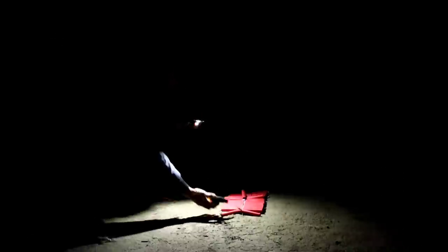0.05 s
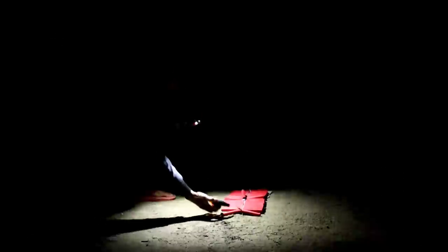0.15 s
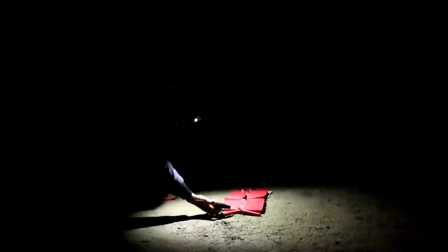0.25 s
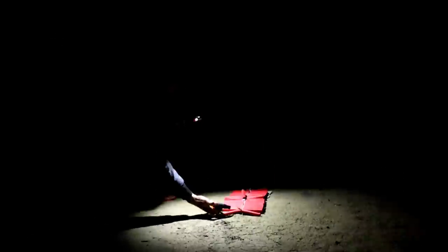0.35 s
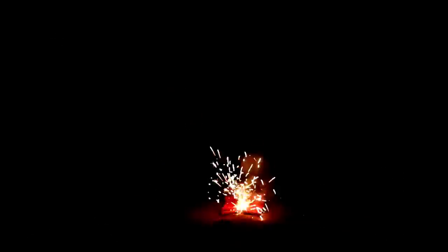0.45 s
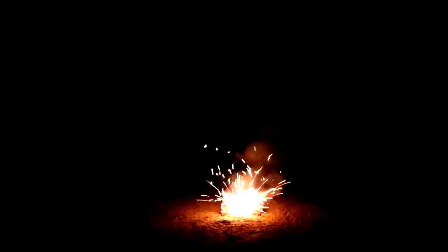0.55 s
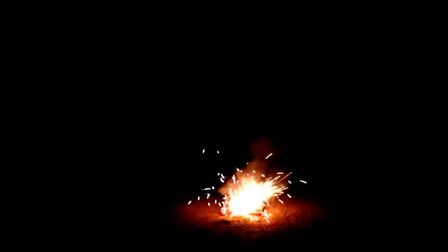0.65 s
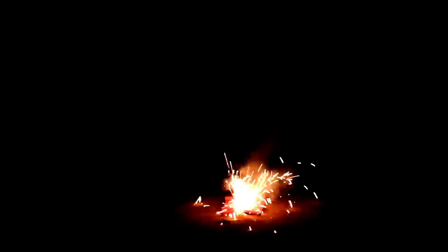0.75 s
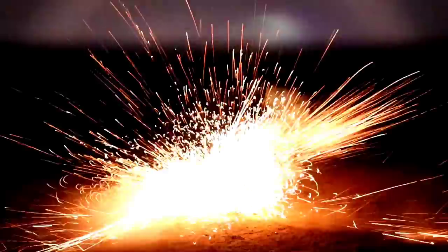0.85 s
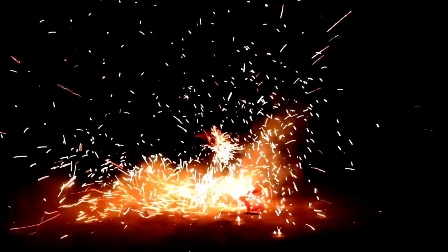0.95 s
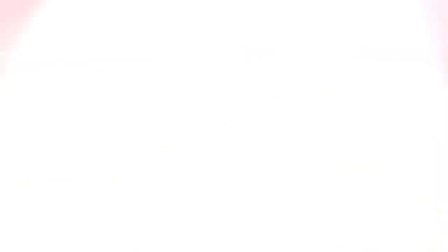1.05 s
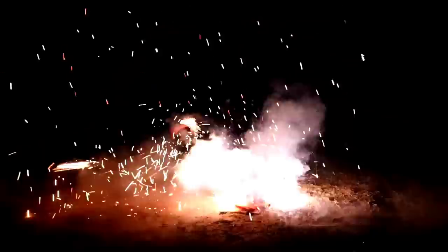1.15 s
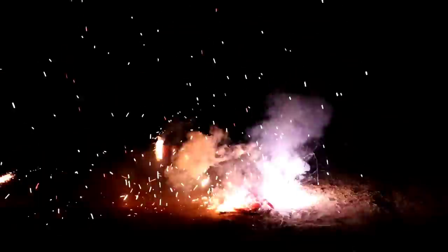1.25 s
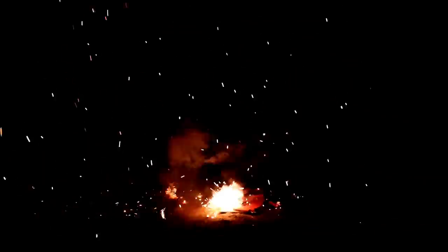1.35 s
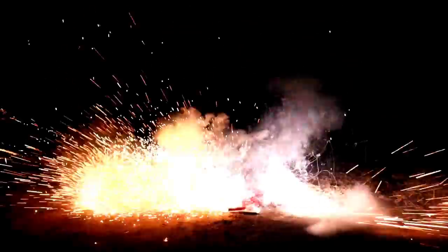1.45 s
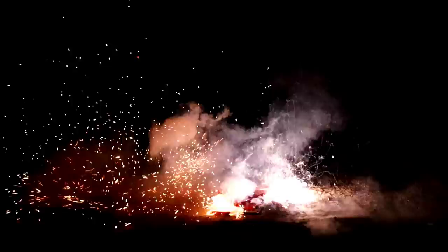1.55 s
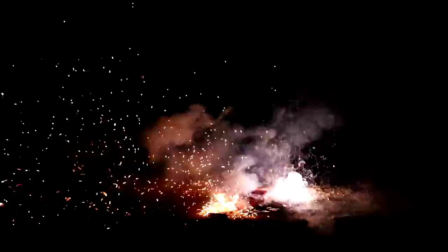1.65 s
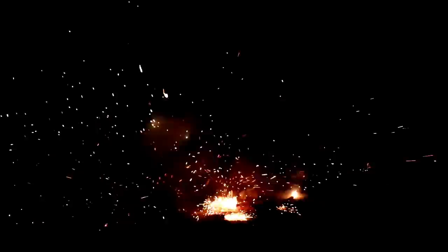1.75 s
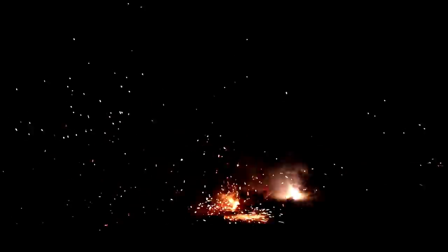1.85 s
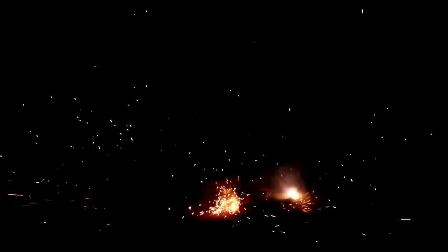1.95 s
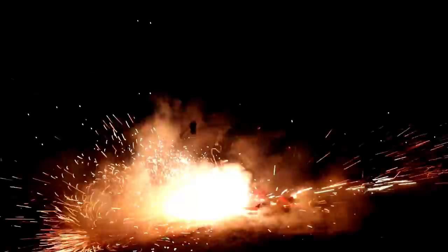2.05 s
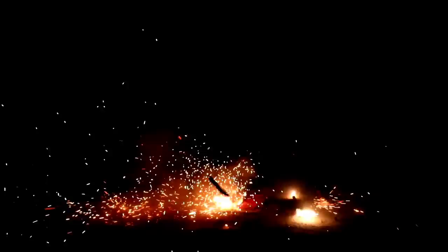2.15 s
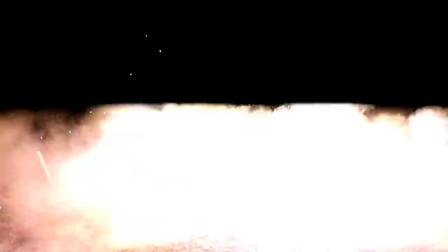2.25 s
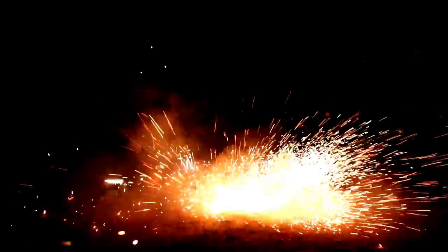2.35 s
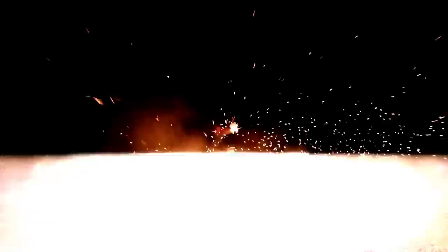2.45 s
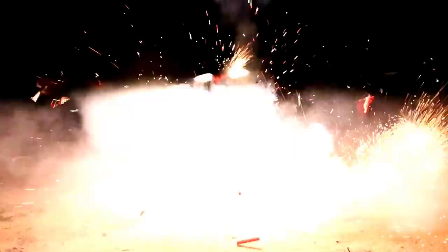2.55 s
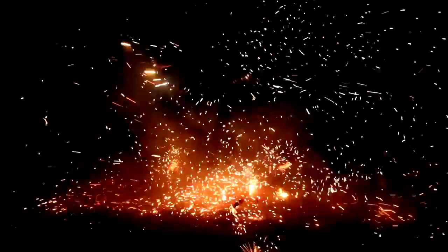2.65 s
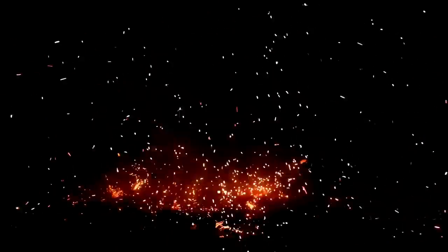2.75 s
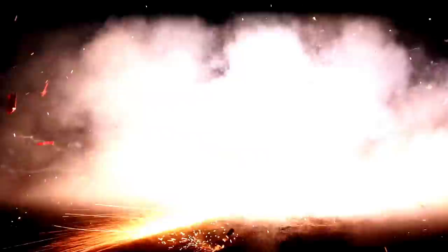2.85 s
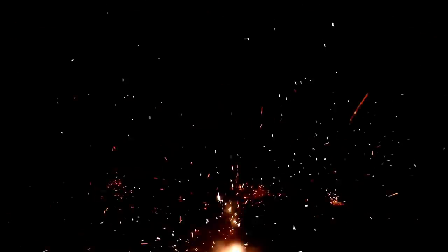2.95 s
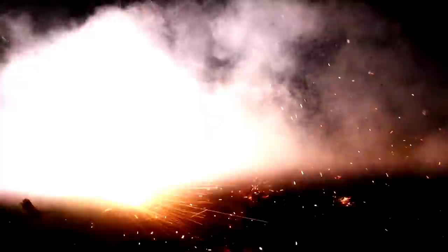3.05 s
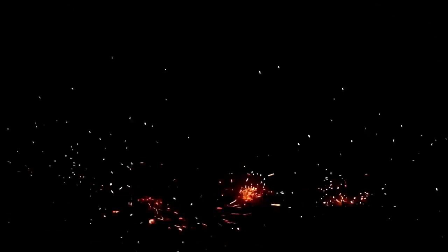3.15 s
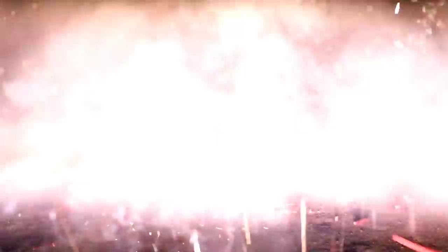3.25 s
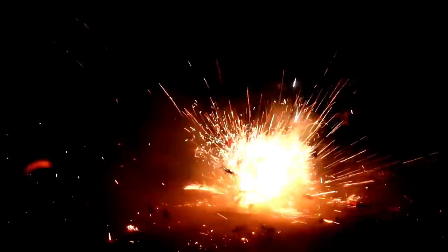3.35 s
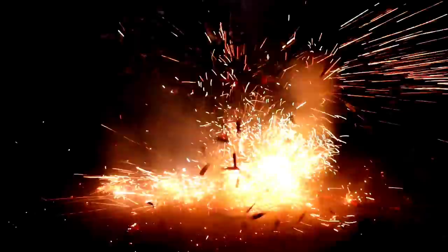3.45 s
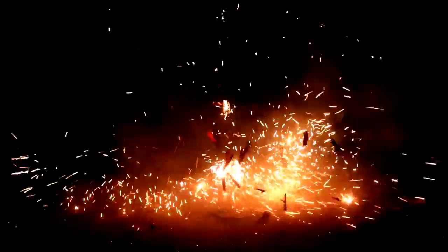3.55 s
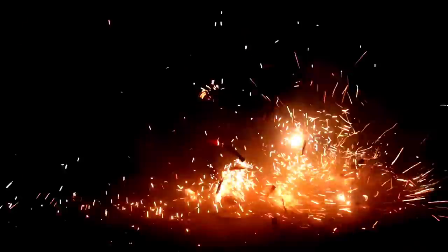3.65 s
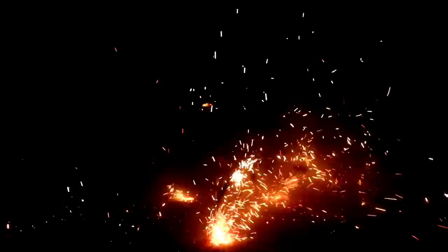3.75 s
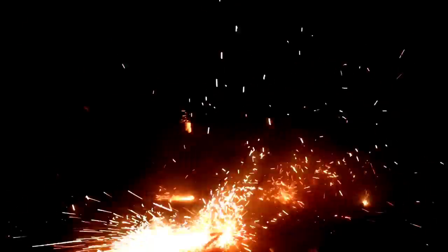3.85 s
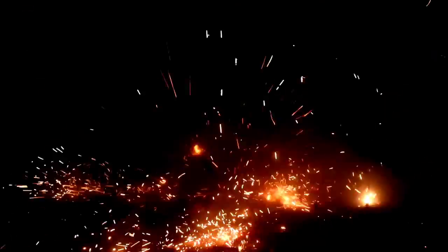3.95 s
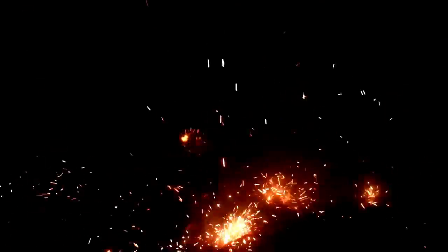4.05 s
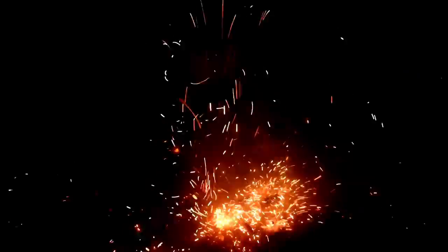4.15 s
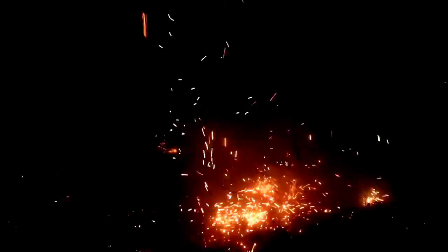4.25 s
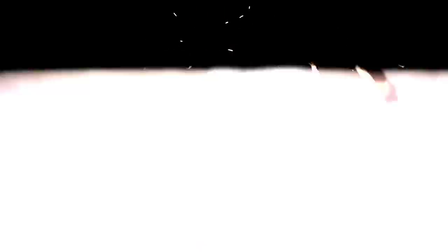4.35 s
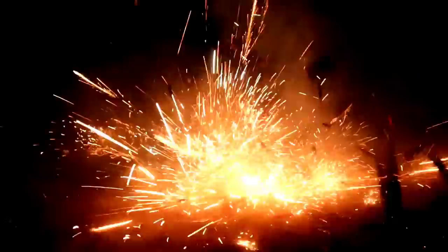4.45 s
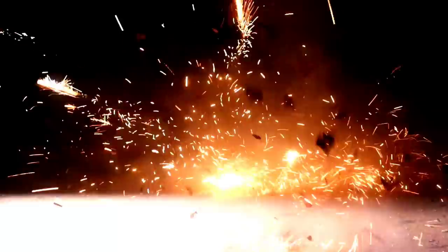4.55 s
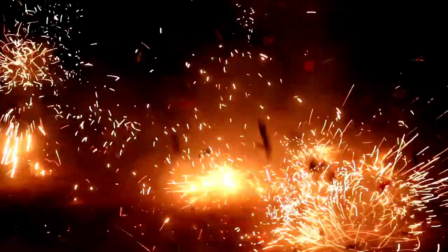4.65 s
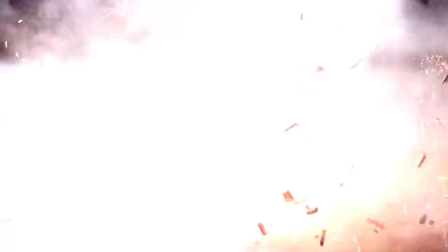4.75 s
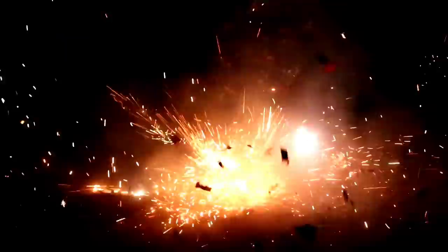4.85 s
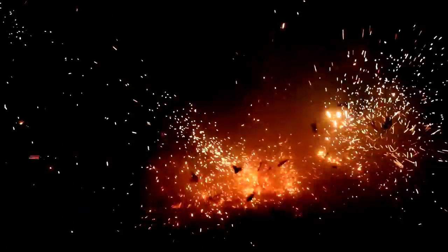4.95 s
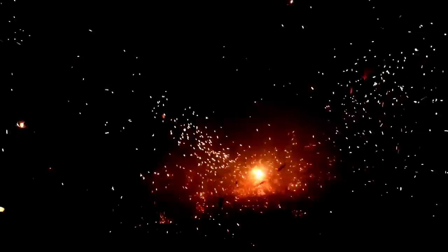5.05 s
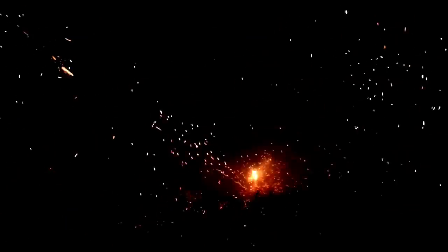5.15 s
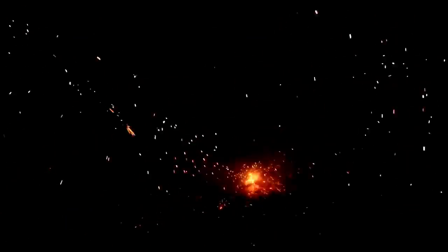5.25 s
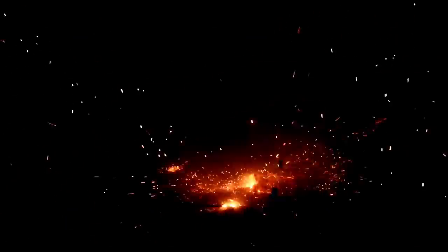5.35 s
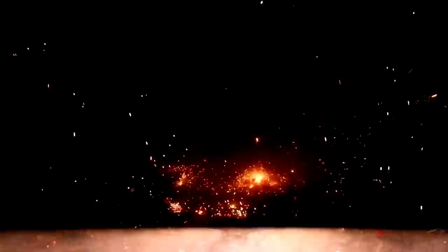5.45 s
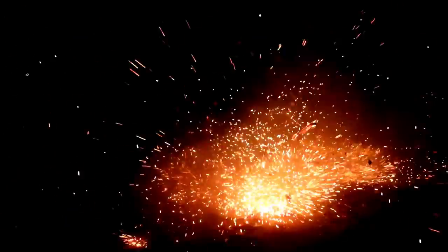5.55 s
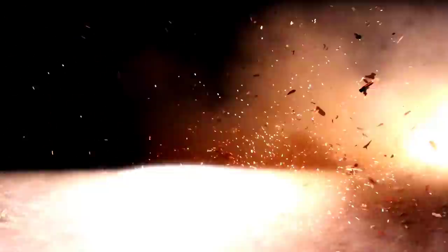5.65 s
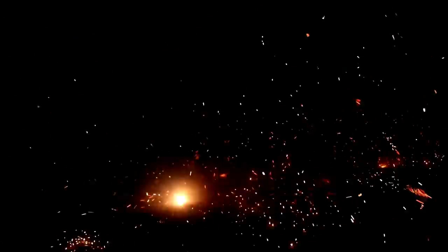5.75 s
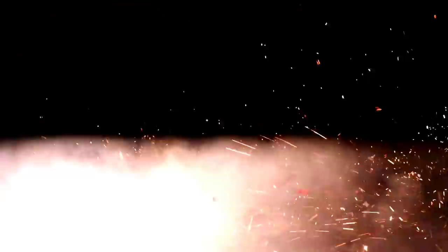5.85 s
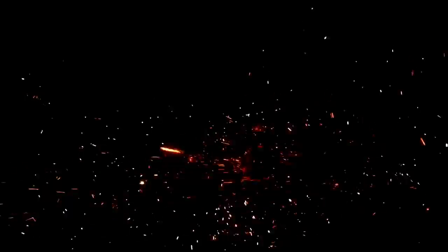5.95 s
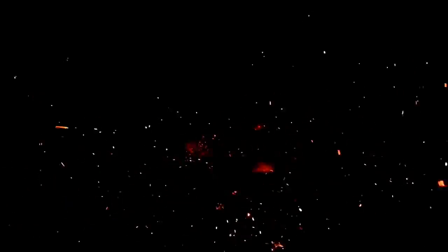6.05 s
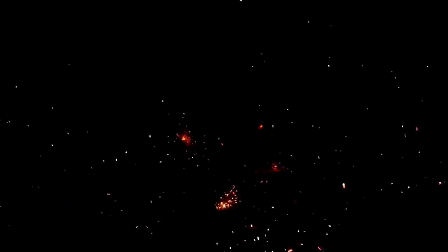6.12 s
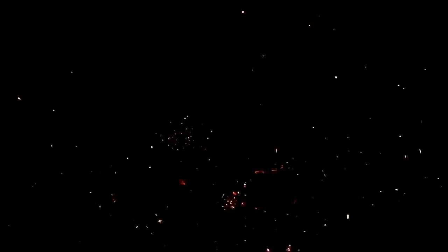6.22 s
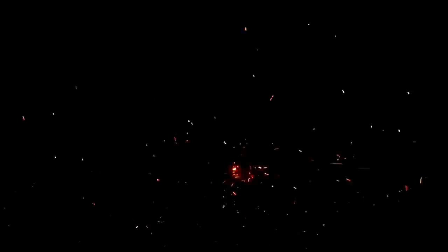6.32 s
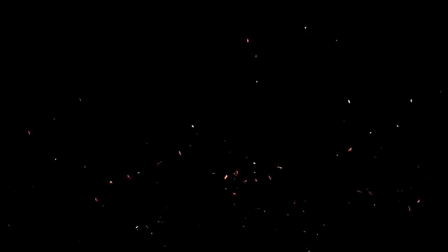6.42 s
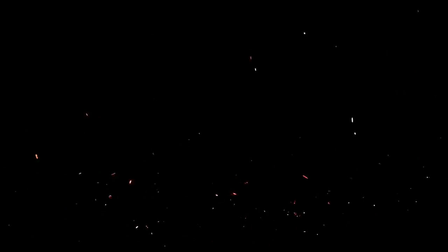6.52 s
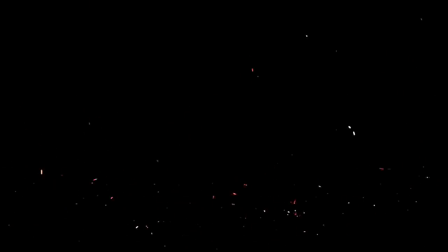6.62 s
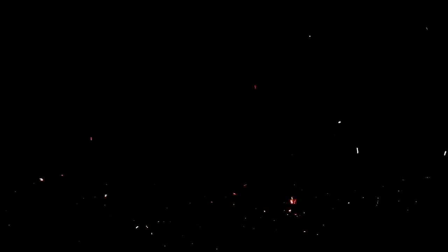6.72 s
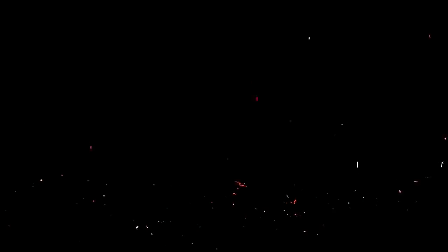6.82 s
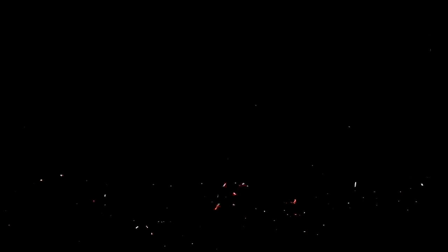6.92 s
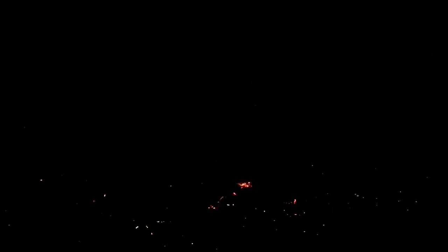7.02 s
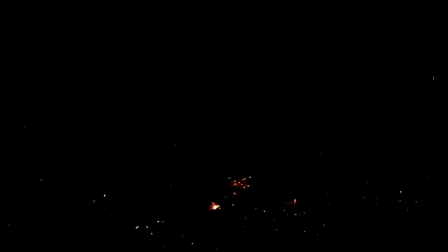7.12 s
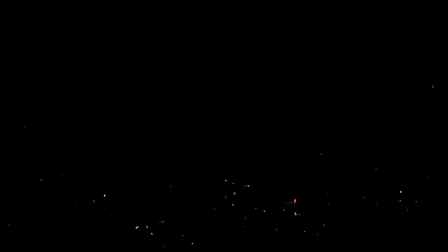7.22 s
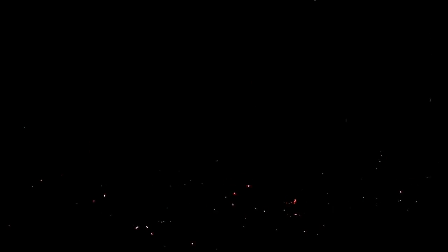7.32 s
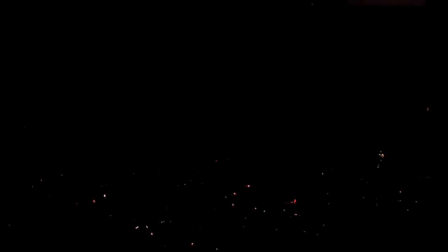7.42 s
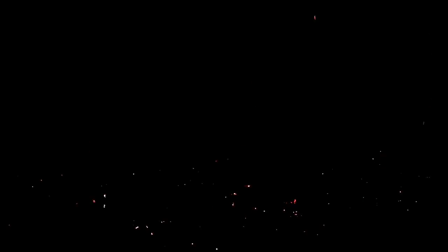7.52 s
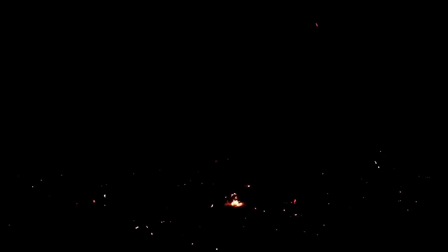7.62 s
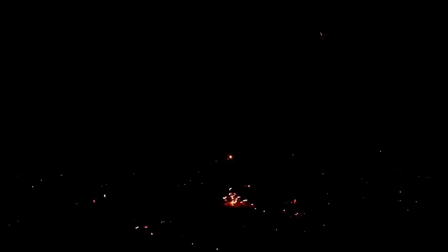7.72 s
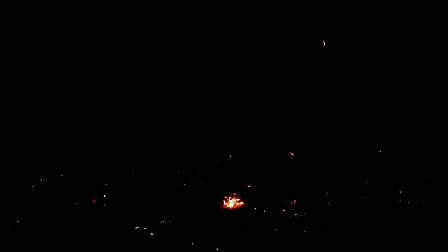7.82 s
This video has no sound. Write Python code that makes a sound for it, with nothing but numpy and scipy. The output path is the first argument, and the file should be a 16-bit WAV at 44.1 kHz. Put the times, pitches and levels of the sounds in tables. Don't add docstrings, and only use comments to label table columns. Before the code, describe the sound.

Outdoors at night, a fuse hisses quietly with spitting embers and little clicks. Firecrackers then burst in sharp, irregular clusters a few metres from a phone. Each bang clips harshly and ducks the sound for a moment, while walls throw back slaps and a boomy tail. The run ends, a quiet lull follows, then one last bang cracks amid fizz.

```python
import sys
import numpy as np
from scipy import signal
from scipy.fft import rfft, irfft
from scipy.io import wavfile
from scipy.ndimage import uniform_filter1d

SR = 44100
rng = np.random.default_rng(int(sys.argv[2]) if len(sys.argv) > 2 else 0)


def volts_from_decibels(level):
    exponent = np.asarray(level, float) / 20
    return 10 ** exponent


def transcribe(u):
    v = np.clip(np.atleast_2d(u).T, -1, 1)
    q = np.round(v * 32767).astype(np.int16)
    wavfile.write(sys.argv[1], SR, q)


N = 347575

# start in seconds, overload length in ms,
# echo strength in dB, brightness in dB, gain change after it in dB.
MAIN_BLASTS = [(0.9487, 2.47, -11.5, -32, 6), (0.9651, 1.82, -21, -4, -35), (1.5728, 1.4, -24.5, -11, 1.5),
               (1.7061, 0.68, -44.5, -1, 8), (1.8437, 1.86, -16.5, -5, 0.5), (2.0367, 2, -17.5, -7, -23.5),
               (2.1786, 2.36, -35.5, 5.5, -32.5), (2.4091, 1.34, -27, 4, -6.5),
               (2.4963, 1.28, -21, -5, -29.5), (2.6112, 0.97, -32.5, 5, -10),
               (2.6487, 1.43, -19.5, -12.5, -25.5), (2.7096, 1.27, -23, 1, 5),
               (2.7282, 2.2, -23.5, -16, -39), (3.004, 2.1, -27, -2.5, -13.5),
               (3.0579, 2.6, -45, -9, -2.5), (3.2038, 2.05, -24.5, -3.5, -27.5),
               (3.3973, 1.51, -23.5, 5.5, -6.5), (3.4894, 0.79, -18.5, 1.5, -20),
               (3.5606, 1.66, -29, -9, -23), (3.6344, 1.8, -32, 3, -19.5),
               (3.7606, 1.88, -27.5, 13, -13.5),
               (4.0628, 0.99, -21.5, -8, -8.5), (4.2235, 1.9, -24, 0.5, 0),
               (4.524, 0.92, -18.5, -8.5, -15.5), (4.636, 2.07, -29.5, -10.5, -26.5),
               (4.7341, 2.03, -39, 1, -0.5), (4.7464, 3.1, -43, 10, -15), (4.8608, 0.93, -37.5, 7, -13),
               (4.8982, 0.88, -45, 6, -6), (4.9275, 3.03, -46, -4, -6.5), (4.9513, 1.3, -26, -0.5, -11.5),
               (5.0541, 0.64, -37.5, -13, -29), (5.4475, 2.2, -51, -12, -1),
               (5.6164, 1.57, -22.5, -4.5, -5), (5.6599, 1.54, -27.5, -9, -19.5), (5.8078, 3.4, -24, -6, 4),
               (5.8323, 2.15, -34.5, -12, -19), (5.9432, 1.54, -30, 4, -25), (5.9628, 1.24, -33, -4, 2),
               (6.0089, 2.3, -45, 12, -28.5), (6.0449, 3.56, -24.5, -6, -6.5),
               (6.3855, 0.87, -28.5, 0.5, 10), (7.5287, 0.89, -17, -10.5, -19)]
BLASTS = MAIN_BLASTS


def colour(x, shape):
    hz, db = np.transpose(shape)
    log_f = np.log(np.arange(N // 2 + 1) * SR / N + 1)
    y = irfft(rfft(x) * volts_from_decibels(np.interp(log_f, np.log(hz), db)), N)
    return y / y.std()


def resonate(x, hz, width):
    return signal.lfilter(*signal.iirpeak(hz, hz / width, SR), x)


def grains(spread_db):
    size = np.minimum(rng.exponential(size=N), 3)
    x = rng.standard_normal(N) * volts_from_decibels(spread_db * size)
    return x / x.std()


def walk(rate):
    k = int(SR / rate)
    held = np.repeat(rng.standard_normal(N // k + 1), k)
    return uniform_filter1d(held, k)[:N]


def add(out, s, piece):
    i = int(s * SR)
    out[i:i + len(piece)] += piece[:N - i]


def traffic(rumble_db):
    # frequency in Hz, spectral density in dB per Hz.
    rumble_spectrum = [(12, -48), (20, -10), (49, 3), (114, 7), (217, 6), (497, -10.5), (823, -14.5),
                       (1070, -18), (2500, -22), (3250, -25.5), (5500, -120)]
    return volts_from_decibels(rumble_db + 1.5 + 3 * walk(30)) * colour(rng.standard_normal(N), rumble_spectrum)


def fuses(fizz_db):
    # peak in seconds, rise in ms, fall in ms, level in dB.
    flare_events = [(0.236, 5.4, 9.2, -46), (0.271, 8.3, 18, -43), (0.352, 10.5, 8.8, -37.5),
                    (.62, 12, 14, -42.5), (0.659, 8.1, 20, -33), (.885, 46, 44, -53),
                    (1.569, 6, 0.81, -8.5), (1.596, 2, 1.1, -25.5), (2.038, 2, 1.5, -3.5),
                    (3.006, 5.3, 1.5, -16), (3.054, 4.7, 9, -26), (3.139, 0.5, 4.6, -9.5),
                    (3.969, 5, 2.8, -34), (5.056, 18, 5.3, -25), (5.149, 5.7, 3.5, -27),
                    (5.448, 5, 4.5, -20), (7.685, 10, 8, -36.5), (7.604, 1, 4, -25),
                    (3.128, 0.68, 1.2, -15)]
    # frequency in Hz, spectral density in dB per Hz.
    fizz_spectrum = [(410, -27), (700, 2), (934, 1), (1520, 5), (10500, -6), (15000, -12), (16000, -14)]
    t = np.arange(N) / SR
    gain = volts_from_decibels(fizz_db + 2.4 * walk(53))
    for peak, rise, fall, db in flare_events:
        slope = np.minimum((t - peak) * 1000 / rise, (peak - t) * 1000 / fall)
        gain = gain + volts_from_decibels(db) * np.exp(slope)
    return gain * colour(grains(3), fizz_spectrum)


def embers():
    # start in seconds, peak in dB.
    spit_events = [(.19, -35.5), (.236, -26), (.255, -27), (.268, -21.5), (.355, -31), (.404, -35),
                   (.446, -25.5), (.615, -34), (0.71, -22.5), (1.277, -38), (1.509, -28), (1.83, -31),
                   (2.021, -19), (2.074, -24), (3.1375, -7), (6.65, -52), (6.76, -44), (6.835, -43),
                   (6.918, -43), (7.0, -46), (7.195, -49), (7.399, -41), (7.855, -44), (7.874, -28)]
    spit_ms, spit_hz = 2.05, 5800
    ping_s, ping_hz, ping_db, ping_t60_s = 3.141, 4750, -25, .11
    out, t = np.zeros(N), np.arange(6000) / SR
    grit = rng.standard_normal((len(spit_events), len(t)))
    for (s, db), noise in zip(spit_events, grit):
        add(out, s, volts_from_decibels(db) * noise * np.exp(-t * 1000 / spit_ms))
    out = resonate(out, spit_hz, 9000)
    add(out, ping_s, volts_from_decibels(ping_db - 60 * t / ping_t60_s) * np.sin(2 * np.pi * ping_hz * t))
    return out


def ticks():
    # start in seconds, peak in dB, pitch in Hz.
    scrap_events = [(0.355, -24, 2080), (0.404, -28.5, 1510), (0.447, -17, 1710), (0.704, -14.5, 553),
                    (0.711, -18, 840), (0.731, -8, 1430), (0.757, -25, 1680), (0.775, -28, 555),
                    (0.872, -12, 1300), (0.884, -18, 774), (6.832, -38, 1320), (6.998, -37, 501)]
    out, t = np.zeros(N), np.arange(400) / SR
    grit = rng.standard_normal((len(scrap_events), len(t)))
    for (s, db, hz), noise in zip(scrap_events, grit):
        click = 0.097 * noise * np.exp(-t / 0.0045)
        ring = np.sin(2 * np.pi * hz * t) * np.exp(-t * hz / 1.1)
        add(out, s, volts_from_decibels(db) * (click - ring))
    return out


def charges():
    # start in seconds, overload length in ms, depth in dB.
    neighbour_events = [(1.5687, .7, -4.7), (1.57, .43, -6), (1.7079, .39, -4), (1.8461, 2.13, 0),
                        (1.867, .32, -2.8), (1.8679, .43, -7.4), (1.9386, .32, -5.7), (2.0408, .25, 0),
                        (2.1335, .18, -4.7), (2.6142, 1.2, 0), (2.6401, .14, -5), (2.7135, .34, 0),
                        (2.7145, .2, -2.3), (3.1277, .6, -6), (3.1383, .5, -3.3), (3.3993, 2.72, 0),
                        (3.4029, .59, -4.8), (3.4049, .34, -4.2), (3.4083, .39, -1.5), (3.4094, .34, -4.2),
                        (3.4922, .09, -1.2), (3.493, .25, 0), (3.5632, 1.54, -.5), (3.5679, 1.32, -2.3),
                        (3.5799, .57, -2.2), (3.5836, .2, -2.5),
                        (4.0665, .29, 0), (4.2258, 2.74, 0), (4.5266, .32, 0), (4.5276, 1.22, 0),
                  (4.5302, 1.02, -3.2), (4.536, .57, -.6), (4.5478, .27, -6.2), (4.9003, 1.2, -1),
                  (5.0554, 1.6, -3), (5.6192, 1.2, 0), (5.8129, 1.09, 0), (5.8157, .2, -1.2),
                  (5.8166, .2, -1.4), (6.0493, .43, -5), (6.0512, 1.04, -1.9), (6.388, 1.84, 0),
                  (6.3915, .27, -2.5), (6.3929, .16, -3.9), (7.5311, .48, 0), (7.5326, .25, 0)]
    full_db, crowded_db, recover_ms = -3.5, -31.5, 76
    flips_per_ms, flips_per_db = 3.2, .15
    s, length, _, bright_db, _ = np.transpose(BLASTS)
    pause_ms = np.diff(s, prepend=0) * 1000
    swell_db = full_db + crowded_db * np.exp(-pause_ms / recover_ms)
    flips = (length * (flips_per_ms + flips_per_db * bright_db)).clip(0, 11)
    chain = [(t, ms, db, ms * flips_per_ms, full_db + crowded_db) for t, ms, db in neighbour_events]
    return list(zip(s, length, 0 * s, flips, swell_db)) + chain


def blasts():
    muffled_s = [1.5727, 3.0576, 5.4472, 5.9434]
    sag_hz, let_go_ms, rail_db = 137, 4.5, -0.27
    chatter_ms = 1.7
    out, ms = np.zeros(N), np.arange(-8, 14, 1000 / SR)
    rows = charges()
    chance = rng.random((len(rows), 2, 12))
    grit = rng.standard_normal((len(rows), len(ms)))
    sag = signal.butter(1, sag_hz, "high", fs=SR)
    for (s, length, depth_db, flips, swell_db), (place, stay), noise in zip(rows, chance, grit):
        down = 1. * ((ms >= 0) & (ms < length))
        span = min(length, chatter_ms)
        flips = int(flips * span / length)
        if np.abs(s - np.array(muffled_s)).min() < .0021:
            flips = 1
            down = np.where(ms < length, down, (1 - (ms - length) / let_go_ms).clip(0))
        for k in range(flips):
            start = span * (.08 + .92 * place[k])
            down *= (ms < start) | (ms > start + .03 + .2 * stay[k] ** 3)
        rise = np.exp(-((-ms - .3).clip(0) / .9) ** 1.5)
        fall = np.where(ms > 0, .6 * np.exp(-((ms - length).clip(0) / 1.3) ** 1.6), 1)
        swell = volts_from_decibels(swell_db + 3) * rise * fall
        rasp_shape = np.exp(np.minimum(ms / 0.6, -ms / 1.5))
        rasp = volts_from_decibels(0.5 * swell_db - 11) * noise * rasp_shape * (1 - .8 * down)
        edge = uniform_filter1d(down, 1 + int(abs(depth_db) * 0.38))
        rail = volts_from_decibels(depth_db + rail_db) * signal.lfilter(*sag, edge)
        add(out, s + ms[0] / 1000, swell * (1 - edge) + rasp - rail)
    return out


def ducking():
    recover_ms = 39.5
    t, db = np.arange(N) / SR, np.zeros(N)
    for s, *_, dip_db in BLASTS:
        since = np.maximum((t - s) * 1000 - 2, 0)
        db += dip_db * (1 - np.exp(-since / 3.2)) * np.exp(-(since / recover_ms) ** 3)
    return volts_from_decibels(db)


def echoes():
    # delay in ms, spread in ms, bass in dB, middle in dB, treble in dB.
    surfaces = [(55.8, 4.9, -7, -8, -20), (84.8, 4.4, -21.5, 2, -7.5), (94.3, 1.46, -7, 4.5, -1),
                (102.15, 4.5, -21, 0.5, -4), (121, 4.2, -2, -22.5, -23), (188, 2, -5, -27, -18),
                (224, 0.33, -3, -7, -11.5), (230.7, 6.4, -12.5, -15.5, -14.5),
                (260.5, 14, -11.5, -28.5, -22.5), (268, 3.2, -18, -29, -24), (514, 77, -27.5, -31.5, -31)]
    # centre in Hz, width in Hz, diffuse tail in dB, tail t60 in seconds.
    echo_bands = [
        (303, 405, -12.5, 1.37),
        (730, 1580, -1.5, 0.46),
        (4170, 8700, -24, 1.62),
    ]
    ms, out = np.arange(0, 900, 1000 / SR), 0
    for k, (hz, width, tail_db, t60) in enumerate(echo_bands):
        power = np.zeros(N)
        for s, _, db, treble_db, _ in BLASTS:
            power[int(s * SR)] = volts_from_decibels(2 * db + k * treble_db)
        profile = volts_from_decibels(2 * tail_db - 120 * ms / 1000 / t60) * np.clip(ms / 40, 0, 1)
        for wall in surfaces:
            profile += volts_from_decibels(2 * wall[2 + k]) * np.exp(-((ms - wall[0]) / wall[1]) ** 2)
        envelope = np.sqrt(np.abs(signal.fftconvolve(power, profile)[:N]))
        band = grains(2.5)
        for _ in range(3):
            band = resonate(band, hz, width)
        out = out + envelope * volts_from_decibels(3.37 * walk(70)) * band / band.std()
    return out


def pops(rows):
    out, ms = np.zeros(N), np.arange(-8, 8, 1000 / SR)
    grit = rng.standard_normal((len(rows), len(ms)))
    for (s, db, width), noise in zip(rows, grit):
        width = max(width, .1)
        u = ms / width
        push = .75 * np.exp(-(1.4 * u) ** 2) + .5 * np.exp(-(.5 * u) ** 2) - .3 * np.exp(-(.2 * u) ** 2)
        rough = .04 / width * noise * np.exp(-np.abs(ms) / 1.2)
        add(out, s + ms[0] / 1000, volts_from_decibels(db) * (rough - 1.3 * push))
    return out


def slaps():
    # time in seconds, delay in ms.
    slap_delays = [(0.9, 25), (2.0, 26), (3.0, 32), (4.2, 40), (5.0, 43), (5.7, 51.5), (6.4, 48.8),
                   (7.6, 48.6)]
    usual_echo_db, second_wall_ms = -23, 26.8
    buried_s, buried_db = .05, 25
    rows = []
    gaps = np.diff(np.transpose(BLASTS)[0], append=9)
    for (s, _, db, _, dip_db), gap in zip(BLASTS, gaps):
        db -= buried_db * (gap < buried_s)
        db = 0.85 * (db - usual_echo_db)
        back = s + np.interp(s, *np.transpose(slap_delays)) / 1000
        rows.append((back, -8 + db + 0.49 * dip_db, 0.26))
        rows.append((back + second_wall_ms / 1000, -17 + db + 0.33 * dip_db, 0.34))
    return pops(rows)


def weak_bursts():
    # start in seconds, peak in dB, width in ms.
    downward = [(0.9829, -18, 0.18), (1.0624, -16, 0.34), (1.6693, -17, 0.15), (2.219, -21, 0.5),
                (2.4566, -5, 0.27), (2.5926, -14.5, 0.085), (3.3021, -15, 0.26), (3.4307, -7, 0.27),
                (3.459, -14, 0.13), (3.549, -9, 0.21), (3.6157, -10.5, 0.17), (3.8685, -10.5, 0.52),
                (3.9649, -7.5, 0.065), (4.1445, -11, 0.28), (4.1578, -13, 0.2), (4.2893, -4.5, 0.27),
                (4.3214, -10, 0.2), (4.5497, -6.5, 0.54), (4.6095, -14, 0.3), (4.8014, -13.5, .49),
                (4.8314, -16, 0.47), (5.0494, -6, 0.71), (5.1485, -11.5, 0.4), (5.9095, -18, 0.19),
                (6.4814, -5, 0.18), (7.2759, -24, 0.17), (7.6172, -13, 0.32), (7.7158, -14.5, 0.89),
                (7.7658, -13.5, 0.12), (7.7953, -25, 0.51)]
    upward = [
        (1.161, -3, .25),
        (1.144, -15, .9),
    ]
    return pops(downward) - pops(upward)


def scene():
    # time in seconds, fuse fizz in dB, far rumble in dB.
    bed_levels = [
        (0.0, -57, -49),
        (.52, -54.5, -45.5),
        (.8, -43, -41),
        (2.04, -47, -38.5),
        (6.3, -55.5, -51.5),
        (6.8, -63.5, -49.5),
        (7.53, -53.5, -47),
        (7.88, -50, -47),
    ]
    s, *columns = np.transpose(bed_levels)
    fizz_db, rumble_db = (np.interp(np.arange(N) / SR, s, c) for c in columns)
    around = traffic(rumble_db) + fuses(fizz_db) + embers() + ticks() + echoes()
    air = signal.ellip(8, .3, 50, 15650, fs=SR, output="sos")
    quieter = signal.sosfilt(air, ducking() * around + slaps() + weak_bursts())
    return (blasts() + quieter)[None]


def low_pass(x):
    return signal.sosfilt(signal.butter(12, 16530, fs=SR, output="sos"), x)


def record(dry):
    sag = signal.lfilter(*signal.butter(1, 55, "high", fs=SR), dry)
    sag = signal.lfilter(*signal.butter(2, 26, "high", fs=SR), sag)
    clipped = np.clip(sag, -.92, .92)
    top = signal.sosfilt(signal.ellip(9, .5, 60, 16300, fs=SR, output="sos"), clipped)
    top = signal.lfilter(*signal.butter(2, 14500, fs=SR), top)
    return low_pass(top)


dry = scene()
out = record(dry)
transcribe(out)
```